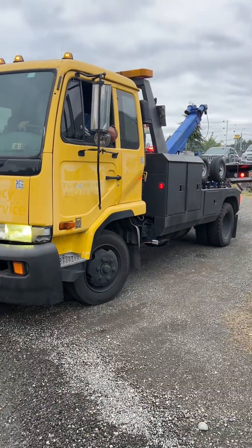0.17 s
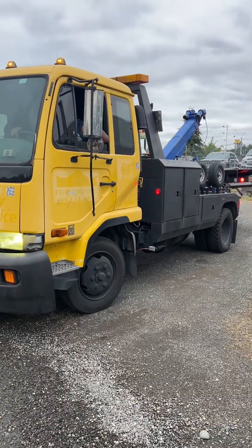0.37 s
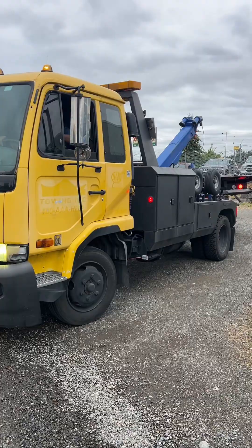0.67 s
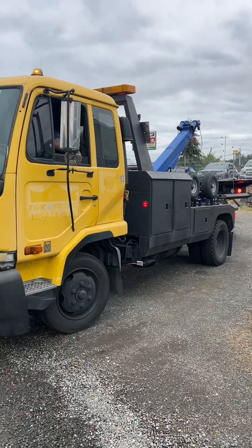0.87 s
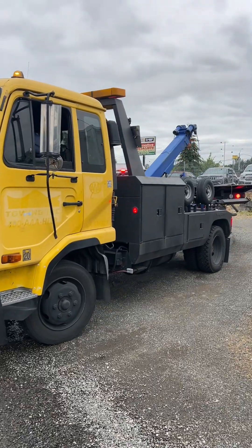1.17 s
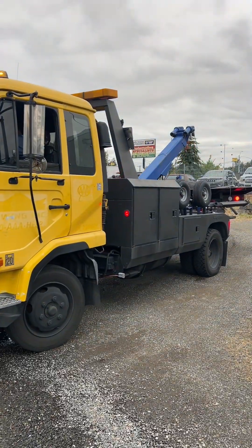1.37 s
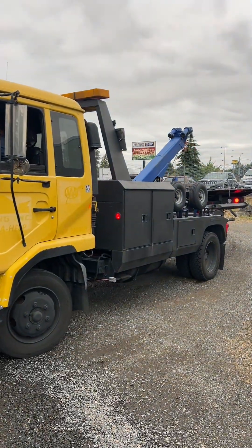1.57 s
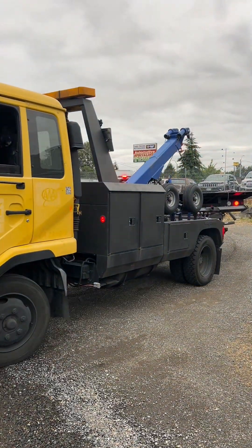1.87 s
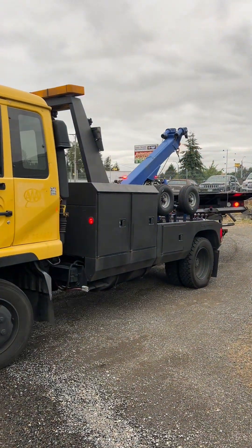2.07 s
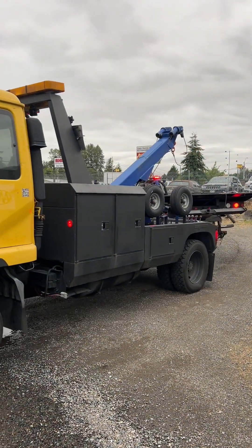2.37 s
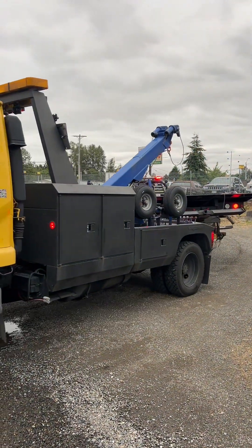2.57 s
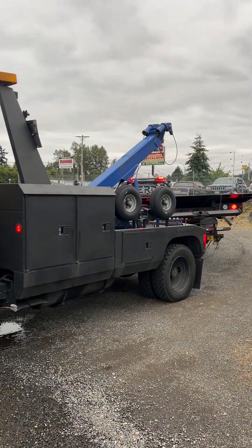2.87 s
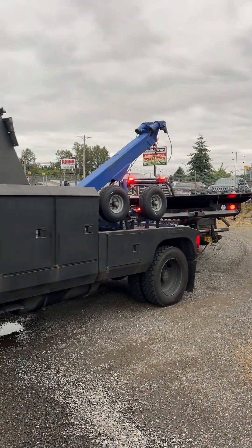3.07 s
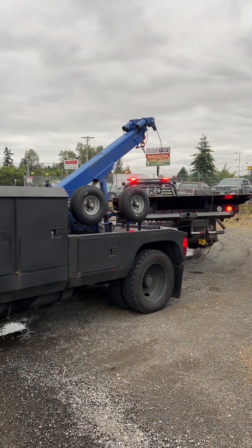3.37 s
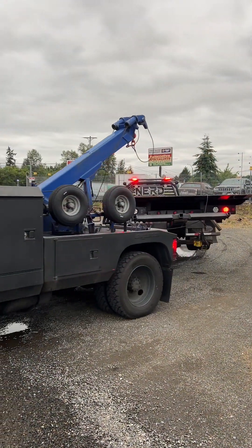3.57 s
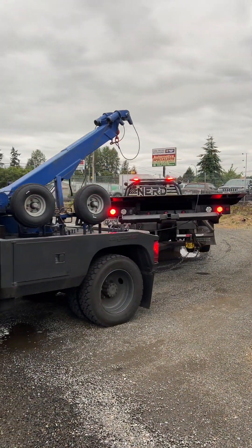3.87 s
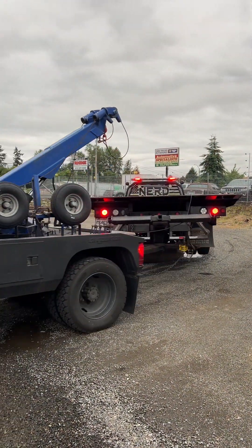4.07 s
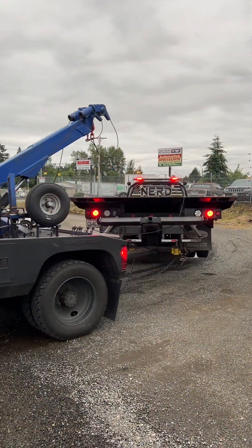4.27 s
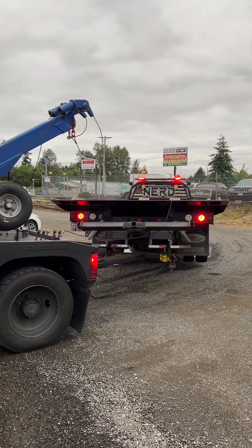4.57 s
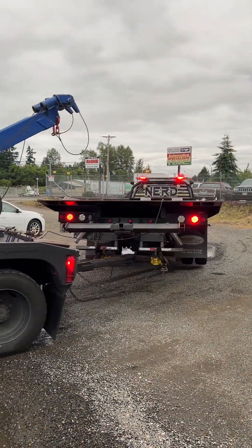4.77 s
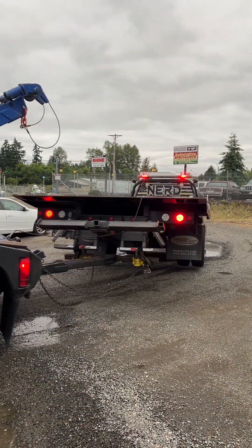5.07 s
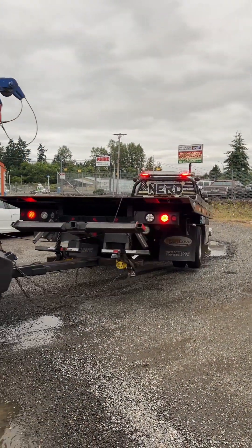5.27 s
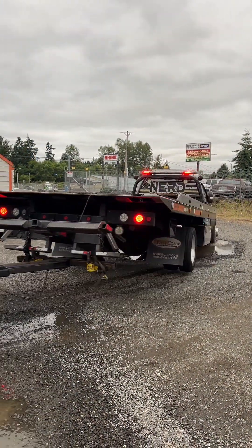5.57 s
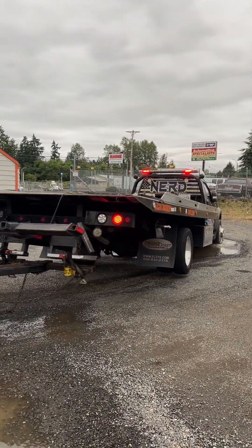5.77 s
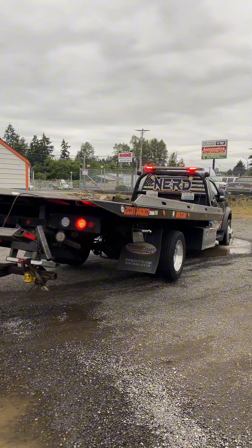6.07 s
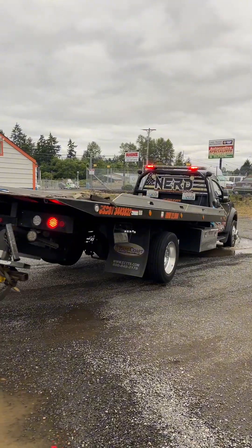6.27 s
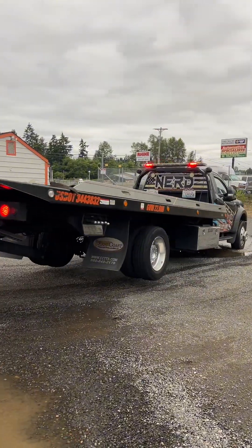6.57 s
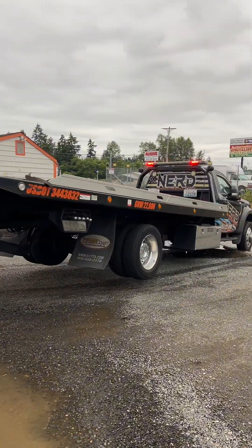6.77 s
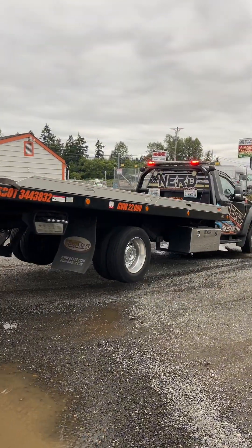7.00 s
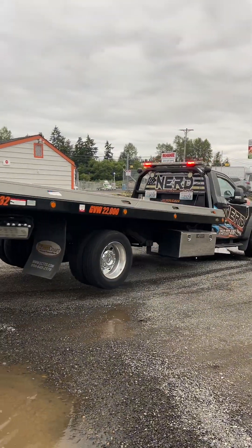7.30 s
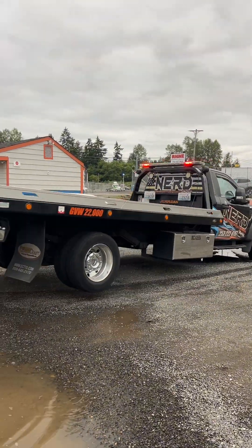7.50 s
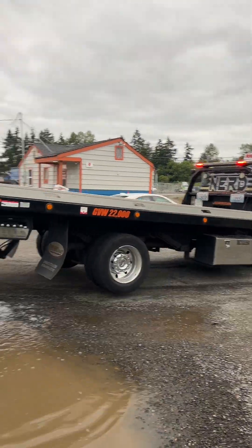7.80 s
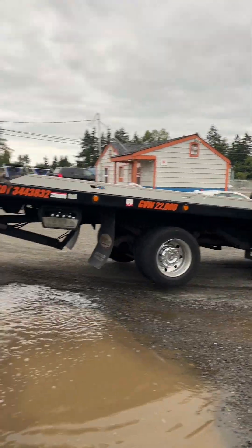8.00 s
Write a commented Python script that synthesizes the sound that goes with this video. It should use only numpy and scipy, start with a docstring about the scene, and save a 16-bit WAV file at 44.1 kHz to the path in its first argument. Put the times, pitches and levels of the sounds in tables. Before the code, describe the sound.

Close pass of a heavy diesel wrecker towing a flatbed: swelling exhaust boom, rapid knocking, crunching gravel, one thudding metal bump and hissing puddles.

```python
"""Diesel wrecker towing a flatbed

A diesel wrecker pulls away across wet gravel, close by, with a flatbed truck in tow.
Engine: tailpipe tones and puffing noise, pulsed block and casing noise, and struck crankcase modes.
One cylinder knocks hard, and rumble and clatter get louder as the engine runs faster.
Tyres: uneven filtered noise roars, decaying grains crackle, stones snap and puddles hiss as spray.
The towing gear knocks on a bump as ringing steel; gliding tones give the final drive, drones and a squeak."""
import sys
import numpy as np
from scipy import signal
from scipy.fft import rfft, irfft, next_fast_len
from scipy.io import wavfile
from scipy.ndimage import uniform_filter1d, map_coordinates

SR = 44100
rng = np.random.default_rng(int(sys.argv[2]) if len(sys.argv) > 2 else 0)


def waveform_to_disk(signal):
    """Save audio, clipped to [-1, 1], as 16-bit WAV at the path in sys.argv[1]."""
    frames = np.transpose(np.atleast_2d(signal))
    scaled = np.clip(frames, -1, 1) * 32767
    samples = np.round(scaled).astype(np.int16)
    wavfile.write(sys.argv[1], SR, samples)


N = 358974

# Engine speed: (time [s], firing rate [Hz])
FIRING_RATE = [(0.0, 33.33), (0.32, 37.07), (0.86, 43.95), (1.09, 46.77), (2.4, 48.22), (2.83, 47.46),
               (3.6, 47.56), (3.9, 46.62), (4.6, 48.58), (5.01, 46.47), (5.89, 46.8), (6.21, 43.4),
               (6.6, 46.6), (7.16, 47.4), (7.41, 47.46), (7.8, 43.62), (8.14, 45.6)]
CRUISE_HZ = 47
# Combustion strength of each cylinder, in firing order: (relative level [dB])
CYLINDER_LEVELS = [2, -.5, .8, -.8, -1.5, 0]
# Gain for each Hz of firing rate above cruising [dB per Hz]
RUMBLE_DB_PER_HZ, CLATTER_DB_PER_HZ, GRIT_DB_PER_HZ = 0.6, 0.47, 0.2
# Share of the noise power that repeats each engine cycle
BLOCK_REPEAT, RUMBLE_REPEAT = .65, .35
# Lead of the injector ticks and of the boom's peak over combustion [share of a firing period]
INJECTION_LEAD, BOOM_LEAD = .12, .24

# Single rows for parts going by: (nearest at [s], level there [dB], half length of the pass [s],
# steepness [1 = inverse distance, more when the body shadows it])
TAILPIPE_RUMBLE_PASS = (6, -27.5, .5, 0.4041)
SECOND_ORDER_PASS = (5, -25.5, 2, 1.63)
ENGINE_BAY_PASS = (3, -41, 4.5, 3)
GEARBOX_PASS = (4.5, -37.5, 0.53, 1.36)
RAP_PASS = (4.15, -33, 1.05, 1.6)  # ordinary firings rapping the crankcase
TOWED_CHASSIS_PASS = (7, -38, 0.65, 1.7)
DRIVELINE_PASS = (5.5, -32.5, 0.62, 1)  # hum of the final drive

# Tailpipe boom at the firing rate: (time [s], level [dB])
BOOM_LEVELS = [(0.0, -54), (0.02, -56), (0.41, -44), (0.75, -47), (0.91, -38.5), (2.22, -28.5),
               (4.33, -21.5), (5.92, -22.5), (6.08, -27.5), (6.51, -23), (7.48, -24), (7.62, -28),
               (8.09, -25), (8.14, -22)]
# Brief swells and dips of the second order: (centre [s], half length [s], level change [dB])
SECOND_ORDER_SWINGS = [(2, 0.13, -3), (2.642, 0.17, -9), (3.3, 0.25, 1.5), (3.94, 0.085, 3.5),
                       (4.45, 0.055, -16), (6.15, 0.066, -5), (6.348, 0.074, 3), (7.53, 0.1, -6.5),
                       (7.767, 0.14, 7.5)]
# Upper exhaust lines standing out in turn:
# (multiple of the firing rate [ratio, rounded to sixths], loudest at [s], level [dB], half length [s])
EXHAUST_LINES = [(4.67, 1.8, -36.5, 0.354), (3.5, 1.88, -41, .4), (5.67, 3.36, -45, 1.23),
                 (5, 5.3, -44, 2.4)]
# Tailpipe noise spectrum: (frequency [Hz], relative density [dB per Hz])
RUMBLE_SPECTRUM = [(20, -24), (52, -6.5), (78, 7), (150, 3.5), (200, -1), (310, -4), (420, -10),
                   (600, -16.5), (1500, -79)]

# Engine block noise spectrum: (frequency [Hz], relative density [dB per Hz])
BLOCK_SPECTRUM = [(330, -10), (470, -1.5), (550, 3), (700, 4.5), (840, -3), (1010, -1), (1400, -2.5),
                  (2000, -10), (2600, -11.5), (3000, -21), (4150, -12), (5000, -24.5), (9000, -58)]
# Gearbox casing noise spectrum: (frequency [Hz], relative density [dB per Hz])
CASING_SPECTRUM = [(600, -12), (1120, -1), (1650, -8.5), (2400, -17.5), (6000, -59)]
# Resonances of the chassis and its covers: (frequency [Hz], width [Hz], lift [dB])
PANEL_MODES = [(473, 22, 3.5), (1000, 73, 1.5), (2530, 210, 1.5)]
# The open engine bay faces the listener: (most open at [s], half length [s])
FACING_SWELL = (2.1, 2.2)

# Blows of the hard-knocking cylinder: (time [s], level [dB])
HARD_KNOCK_BLOWS = [(3.639, -22), (3.767, -26), (3.8955, -21.5), (4.024, -22), (4.1514, -22.5),
                    (4.278, -23.5), (4.4034, -23.5), (4.528, -23.5), (4.776, -26), (5.016, -26.5),
                    (5.1417, -25)]
# Crankcase modes: (frequency [Hz], relative level [dB], decay by 60 dB [s])
CRANKCASE_MODES = [(1150, -1, .034), (1340, -1.5, .024), (1640, -9, .018), (2580, -17, .024)]
RAP_SCATTER_DB = 2
# Covers kept ringing by the firings: (loudest at [s], frequency [Hz], width [Hz], level [dB], half length [s])
COVER_RINGS = [(1.798, 650.8, 21, -50, 0.56), (3.35, 1118, 14, -43.5, .5), (3.5, 2600, 57, -50.5, 0.14),
               (4.052, 1267, 54, -42.5, 0.41), (4.554, 1135, 47, -38, 0.18)]

# Towing gear contacts: (time [s], thump level [dB], clank level before CLANK_LIFT_DB [dB])
TOW_CONTACTS = [(6.411, -22, -29), (6.4205, -14, -29), (6.434, -14, -35), (6.4465, -14, -42),
                (6.4665, -19, -32), (6.568, -40, -37), (6.622, -32, -31)]
# Modes of the steel bed: (frequency [Hz], typical relative level [dB], decay by 60 dB [s])
BED_MODES = [(128, -5, 0.049), (161, -1, 0.11), (190, -3, 0.18), (248, -6, 0.052), (351, -11, 0.16),
             (654, -19.5, 0.16)]
# Loose steel noise spectrum: (frequency [Hz], relative density [dB per Hz])
CLANK_SPECTRUM = [(100, -7), (700, 4), (1200, -14), (3000, -7), (10000, -32)]
CLANK_LIFT_DB, CLANK_T60_S = 1, 0.087

# Tread roar at the front, rear and towed axle:
# (nearest at [s], level there [dB], half length [s], steepness [1 = inverse distance])
TREAD_PASSES = [(3.25, -38.5, 1.71, 1.81), (5.9, -34, 1.77, 2.35), (8.1, -36, 0.37, 1.65)]
# Tread roar spectrum: (frequency [Hz], relative density [dB per Hz])
ROAR_SPECTRUM = [(180, -4), (330, 3.5), (520, -2.5), (780, 1.5), (1000, -3), (1450, -2.5), (2000, -8.5),
                 (2600, -18), (4000, -18.5), (7000, -42.5)]
# Harder grinding on rough ground after the bump: (loudest at [s], half length [s], level [dB])
ROUGH_GROUND = (6.63, 0.32, -35)
# Towed chassis noise spectrum: (frequency [Hz], relative density [dB per Hz])
GROWL_SPECTRUM = [(200, -18), (350, 9.5), (480, -6.5), (850, -7), (1130, 1.5), (1600, -13.5), (3000, -46)]

# Grit crushed at the three axles:
# (nearest at [s], level there before GRIT_LIFT_DB [dB], half length [s], steepness [1 = inverse distance])
GRIT_PASSES = [(2.6, -49, 1.46, 2.43), (5.1, -44.5, 2.56, 2.95), (8.1, -49.5, 0.21, 3.1)]
GRIT_LIFT_DB, GRAIN_T60_S = 1.5, .014
# Gravel noise spectrum: (frequency [Hz], relative density [dB per Hz])
GRAVEL_SPECTRUM = [(1500, -2.5), (2600, -2), (4200, -3), (5100, -5.5), (5750, 2.5), (7000, -0.5),
                   (8000, 0.5), (9000, -4.5), (10000, -13.5), (11500, -36)]
# Stones snapping under the tyres: (time [s], noise level before STONE_GAIN [dB])
STONE_SNAPS = [(2.796, -43), (4.304, -38.5), (4.867, -39), (6.167, -40)]
STONE_GAIN = 1.8

# Tyres in puddles: (start [s], start to fade [s], level [dB])
PUDDLE_SPLASHES = [(5.739, 0.79, -47), (7.501, 0.33, -47.5), (7.88, 0.027, -43.5)]
SPLASH_ATTACK_S, SPLASH_T60_S = 0.031, 0.3
# Spray noise spectrum: (frequency [Hz], relative density [dB per Hz])
SPRAY_SPECTRUM = [(3000, -10.5), (5500, -6), (7000, 0.5), (8500, -0.5), (9500, -6), (11500, -23.5)]

# Driveline pitch when nearest, and its steady climb
DRIVELINE_HZ, CLIMB_HZ_PER_S = 148.3, 18
# Drones out of step with the diesel:
# (loudest at [s], pitch there [Hz], glide [Hz per s], level [dB], half length [s])
PASSING_DRONES = [(0.917, 668, -1, -44, 0.041), (1.3, 113, 30, -41.5, 0.58), (2.45, 143.2, 11, -36.5, 0.31),
                  (3.051, 76.2, -8.5, -34, 0.3), (3.618, 136.4, -89, -33.5, 0.098),
                  (4.971, 123.3, -5, -24, 0.543), (5.9, 302.4, -34.5, -39, 0.38)]
# Squeak from the towed truck: (loudest at [s], pitch there [Hz], glide [Hz per s], level [dB], half length [s])
JOINT_SQUEAKS = [(8.1, 1400, -200, -41, .04)]
SQUEAK_OCTAVE_DB = -14  # against the squeak itself

# Ground bounce thinning a band while the truck is far:
# (centre [Hz], half width at 1/e [Hz], deepest at [s], half length [s])
GROUND_DIP = (850, 100, .8, 1.6)
# The two microphone ports:
# (frequency [Hz], side against mid [dB], side phase [rad], likeness of side and mid [0-1])
PORT_SPREAD = [(110, -19, 0.91, 1), (250, -14.5, 1.85, 0.6), (443, -1, 1.27, 0.84), (845, 4, 1.03, 0.83),
               (1220, 1.5, 0.68, 0.85), (1790, -2, 1.1, 0.57), (2440, 5, 2.9, 0.07), (3540, -1.5, 4.4, 0),
               (5480, 5, 6.1, 0.16), (6200, -25.5, 1.6, 0.3)]
TOP_HZ = 11600


def count_firings(firing_hz):
    """Running firing count, aligned so the middle hard knock falls on the first cylinder."""
    firings = np.cumsum(firing_hz) / SR
    middle_s = HARD_KNOCK_BLOWS[len(HARD_KNOCK_BLOWS) // 2][0]
    at_knock = firings[round(middle_s * SR)]
    return firings + -at_knock % len(CYLINDER_LEVELS)


def exhaust(firings, first_db, second_db, rumble_db):
    """Pressure pulses from the tailpipe: two strong orders, wavering upper lines and a puffing rumble."""
    led = firings + BOOM_LEAD
    angle = 2 * np.pi * led
    first = amp(first_db + .35 * wobble(22)) * np.cos(angle)
    second = amp(second_db + .7 * wobble(16)) * np.cos(2 * angle)
    lines = np.zeros(N)
    cylinders = len(CYLINDER_LEVELS)
    for multiple, s, db, half_s in EXHAUST_LINES:
        # unequal cylinders put the upper lines on sixths of the firing rate
        order = round(multiple * cylinders) / cylinders
        level = amp(db + 1.5 * wobble(4)) * swell(s, half_s)
        lines += level * np.cos(order * angle + 0.28 * wobble(7))
    puff = throb(bursts(led, decay=.4, scatter_db=1), depth=.65)
    puffs = heard(churn(firings, RUMBLE_REPEAT) * puff, RUMBLE_SPECTRUM)
    tones = np.sqrt(2) * (first + second + lines)  # peak to rms level
    return tones + amp(rumble_db) * puffs


def tailpipe_levels(firing_hz):
    """Fundamental, second order and rumble in dB; the rumble follows distance and engine speed."""
    first_db, = curves(BOOM_LEVELS)
    swings_db = sum(db * swell(s, half_s) for s, half_s, db in SECOND_ORDER_SWINGS)
    second_db = passing(*SECOND_ORDER_PASS) + swings_db
    rumble_db = passing(*TAILPIPE_RUMBLE_PASS) + RUMBLE_DB_PER_HZ * (firing_hz - CRUISE_HZ)
    return first_db, second_db, rumble_db


def clatter(firings, facing, effort_db):
    """Combustion rattles block and gearbox casing; the beat blurs as the engine bay turns from view."""
    strokes = bursts(firings, decay=.45, scatter_db=1)
    beat = throb(strokes, depth=.25 + .7 * facing)
    block_db = passing(*ENGINE_BAY_PASS) + .7 * wobble(9)
    block = amp(block_db) * heard(panels(churn(firings, BLOCK_REPEAT) * beat), BLOCK_SPECTRUM)
    casing = amp(passing(*GEARBOX_PASS)) * heard(panels(white() * beat), CASING_SPECTRUM)
    return amp(effort_db) * (block + casing)


def panels(pair):
    """The chassis and its covers ring at a few narrow resonances."""
    def response(f):
        total = 1
        for hz, width, db in PANEL_MODES:
            damping = 1j * f * width
            total = total + (amp(db) - 1) * damping / (hz * hz - f * f + damping)
        return total
    return filtered(pair, response)


def diesel_knock(firings):
    """Firings rap the crankcase modes, one cylinder far harder."""
    def ordinary(s):
        return all(abs(s - hard_s) * CRUISE_HZ > .5 for hard_s, _ in HARD_KNOCK_BLOWS)
    raps = [(s, db) for s, db in each_firing(firings, RAP_PASS) if ordinary(s)]
    return struck(raps + HARD_KNOCK_BLOWS, CRANKCASE_MODES)


def each_firing(firings, way):
    """One (s, dB) blow per firing from a part that goes by."""
    starts = np.flatnonzero(np.diff(np.floor(firings)))
    levels_db = passing(*way)[starts] + RAP_SCATTER_DB * rng.standard_normal(len(starts))
    return list(zip(starts / SR, levels_db))


def struck(blows, modes):
    """Steel modes rung by each (s, dB), with slightly random pitch and a random second phase."""
    t = np.arange(SR // 8) / SR
    attack = 1 - np.exp(-t / .0005)
    out = np.zeros((2, N + SR))
    for hz, level, t60 in modes:
        shape = attack * amp(level - 60 * t / t60)
        for s, db in blows:
            angle = 2 * np.pi * hz * (1 + .015 * rng.standard_normal()) * t
            ring = np.sin([angle, angle + 2 * np.pi * rng.random()])
            out[:, round(s * SR):][:, :len(t)] += amp(db) * shape * ring
    return spread(*out[:, :N])


def covers(firings):
    """Firing noise drives thin steel resonators, their swing compressed by the fastenings."""
    drive = white() * bursts(firings, decay=.3, scatter_db=1)
    out = np.zeros((2, N))
    for s, hz, width, db, half_s in COVER_RINGS:
        pole = np.exp(np.pi * (2j * hz - width) / SR)
        ring = signal.lfilter([1], [1, -pole], drive)
        held_in = ring.real / np.sqrt(np.abs(ring))
        out += amp(db) * swell(s, half_s) * unit(held_in)
    return spread(*out)


def knock():
    """The towing gear drops and bounces: the bed's modes thump and loose steel clanks as noise."""
    t = np.arange(SR // 2) / SR
    attack = 1 - np.exp(-t / .0015)
    thump = np.zeros(N + SR)
    for s, db, _ in TOW_CONTACTS:
        ring = np.zeros(len(t))
        for hz, level, t60 in BED_MODES:
            decay_db = level + rng.standard_normal() - 60 * t / t60
            ring += amp(decay_db) * np.sin(2 * np.pi * hz * t)
        thump[round(s * SR):][:len(t)] += amp(db) * ring * attack
    rattle = amp(1.5 * wobble(450))
    clanks = [(s, db) for s, _, db in TOW_CONTACTS]
    cracks = amp(CLANK_LIFT_DB) * strikes(clanks, t60=CLANK_T60_S) * rattle * white()
    return thump[:N] + np.std(cracks[0]) * heard(cracks, CLANK_SPECTRUM)


def rolling(roar_db):
    """Treads grind over packed stones: a dull, uneven roar; the towed truck's chassis growls along."""
    s, half_s, rough_db = ROUGH_GROUND
    level = np.hypot(amp(roar_db), amp(rough_db) * swell(s, half_s))
    grinding = amp(1.5 * wobble(140) + 1.3 * wobble(20))
    growl = amp(passing(*TOWED_CHASSIS_PASS)) * heard(panels(white() * grinding), GROWL_SPECTRUM)
    return level * heard(panels(white() * grinding), ROAR_SPECTRUM) + growl


def tyre_levels(firing_hz):
    """Roar and grit in dB: the axles add in power, and grit gets louder with engine speed."""
    def total_db(axles):
        return 10 * np.log10(sum(amp(passing(*axle)) ** 2 for axle in axles))
    grit_db = total_db(GRIT_PASSES) + GRIT_DB_PER_HZ * (firing_hz - CRUISE_HZ)
    return total_db(TREAD_PASSES), grit_db


def gravel(firings, facing, crunch_db, grains_per_s, spread_db):
    """Wet grit crackles as random decaying grains, mixed with injector ticks and snapping stones."""
    sizes = amp(spread_db * np.minimum(rng.exponential(size=N), 2))
    cracks = (rng.random(N) < grains_per_s / SR) * sizes
    grain_decay = amp(-60 / (GRAIN_T60_S * SR))
    grit = unit(white() * signal.lfilter([1], [1, -grain_decay], cracks))
    injections = bursts(firings + INJECTION_LEAD, decay=0.43, scatter_db=2)
    ticks = white() * throb(injections, depth=.9 * facing)
    bed = amp(crunch_db + GRIT_LIFT_DB) * unit(ticks + 0.56 * grit)
    snaps = STONE_GAIN * strikes(STONE_SNAPS, t60=0.066) * white()
    mix = bed + snaps
    return np.std(mix[0]) * heard(mix, GRAVEL_SPECTRUM)


def puddles():
    """A tyre throws up a hiss of spray while it is in the water, then the hiss dies away."""
    t = np.arange(N) / SR
    spray = np.zeros(N)
    for s, hold_s, db in PUDDLE_SPLASHES:
        rise = np.clip((t - s) / SPLASH_ATTACK_S, 0, 1)
        spray += rise * amp(db - 60 * np.maximum(t - s - hold_s, 0) / SPLASH_T60_S)
    return spray * amp(2.2 * wobble(60)) * heard(white(), SPRAY_SPECTRUM)


def driveline():
    """The final drive hums at a steadily climbing pitch as it goes by."""
    tone = hum(DRIVELINE_PASS[0], DRIVELINE_HZ, CLIMB_HZ_PER_S, waver_db=1.5)
    return amp(passing(*DRIVELINE_PASS)) * tone


def drone(s, hz, glide, db, half_s):
    """A gliding tone that swells, holds and fades."""
    return amp(db) * swell(s, half_s, order=4) * hum(s, hz, glide, waver_db=1)


def squeaks():
    """A dry joint squeaks: a gliding tone with its octave."""
    out = np.zeros(N)
    for s, hz, glide, db, half_s in JOINT_SQUEAKS:
        out += drone(s, hz, glide, db, half_s)
        out += drone(s, 2 * hz, 2 * glide, db + SQUEAK_OCTAVE_DB, half_s)
    return out


def hum(s, hz, glide, waver_db):
    """A slightly unsteady machine tone that glides through hz at time s."""
    pitch = hz + glide * (np.arange(N) / SR - s)
    angle = 2 * np.pi * np.cumsum(pitch) / SR + 0.16 * wobble(11)
    return np.sqrt(2) * amp(waver_db * wobble(9.9)) * np.sin(angle)


def ground_bounce(pair):
    """The bounce off the ground hollows a band of the distant truck; it fills in as the truck nears."""
    hz, width, s, half_s = GROUND_DIP
    band = filtered(pair, lambda f: np.exp(-((f - hz) / width) ** 2))
    return pair - .7 * swell(s, half_s) * band


def passing(nearest_s, peak_db, half_s, steepness):
    """Level in dB of something that rolls by in a straight line."""
    distance = np.hypot(1, (np.arange(N) / SR - nearest_s) / half_s)
    return peak_db - steepness * 20 * np.log10(distance)


def swell(s, half_s, order=2):
    """A smooth rise and fall: 1 at s, one half at half_s either side; higher orders flatten the top."""
    away = np.abs(np.arange(N) / SR - s) / half_s
    return np.exp2(-np.minimum(away, 2 * np.pi) ** order)


def bursts(firings, decay, scatter_db):
    """An envelope of rms 1 that swells at each firing and decays over a share of the firing period."""
    index = firings.astype(int)
    scatter = scatter_db * rng.standard_normal(1024)[index]
    size_db = np.take(CYLINDER_LEVELS, index % len(CYLINDER_LEVELS)) + scatter
    pulses = amp(size_db) * np.exp(-(firings % 1) / decay)
    return unit(uniform_filter1d(pulses, size=130))  # soften the jumps over 3 ms


def throb(envelope, depth):
    """Blend a pulsing envelope with a steady one at equal power."""
    depth = np.clip(depth, 0, 1)
    return np.sqrt(1 - depth + depth * envelope ** 2)


def strikes(rows, t60):
    """An envelope that jumps at each (s, dB) and dies away."""
    t = np.arange(N) / SR
    total = np.zeros(N)
    for s, db in rows:
        sounding = (t >= s) * (t < s + 2 * t60)
        total += amp(db - 60 * np.clip(t - s, 0, 2 * t60) / t60) * sounding
    return total


def churn(firings, repeat):
    """Two noises, of which a share comes back alike in every engine cycle."""
    size = int(len(CYLINDER_LEVELS) * SR / CRUISE_HZ)
    place = firings / len(CYLINDER_LEVELS) % 1 * size
    loops = rng.standard_normal((2, size))
    cycle = np.array([map_coordinates(row, [place], mode="grid-wrap") for row in loops])
    return np.sqrt(repeat) * cycle + np.sqrt(1 - repeat) * white()


def white():
    """Two unrelated noises."""
    return rng.standard_normal((2, N))


def wobble(rate):
    """A smooth random curve, rate knots a second."""
    coarse = np.linspace(0, N, N // 32)
    knots = rng.standard_normal(int(N * rate / SR) + 4)
    return np.interp(np.arange(N), coarse, map_coordinates(knots, [coarse * rate / SR]))


def curves(rows):
    """One value per sample for each column after the time."""
    s, *cols = np.transpose(rows)
    return [np.interp(np.arange(N) / SR, s, c) for c in cols]


def along(points, hz, axis=1):
    """One column of a (Hz, ..) table on a log axis."""
    cols = np.transpose(points)
    return np.interp(np.log(hz + 1), np.log(cols[0] + 1), cols[axis])


def filtered(x, response):
    """Filter x by a response of frequency."""
    m = next_fast_len(N + SR // 4)
    return irfft(rfft(x, m) * response(np.fft.rfftfreq(m, 1 / SR)), m)[..., :N]


def heard(pair, spectrum):
    """Colour two unrelated signals and spread them over the ports; the mid has rms 1."""
    direct, diffuse = filtered(pair, lambda hz: amp(along(spectrum, hz)))
    return spread(direct, diffuse) / np.std(direct)


def spread(direct, diffuse):
    """Left and right port from a direct signal and an unrelated, scattered one."""
    def width(hz):
        return amp(along(PORT_SPREAD, hz))

    def alike(hz):
        return np.clip(along(PORT_SPREAD, hz, axis=3), 0, 1)

    def phase(hz):
        return np.exp(1j * along(PORT_SPREAD, hz, axis=2))
    side = filtered(direct, lambda hz: width(hz) * alike(hz) * phase(hz))
    side = side + filtered(diffuse, lambda hz: width(hz) * np.sqrt(1 - alike(hz) ** 2))
    return np.array([direct + side, direct - side])


def amp(db):
    """Decibels to gain."""
    return 10 ** (np.asarray(db) / 20)


def unit(x):
    """Scale to rms 1."""
    return x / np.sqrt(np.mean(x ** 2) + 1e-20)


def scene():
    """Both trucks roll past on the open lot."""
    firing_hz, = curves(FIRING_RATE)
    firings = count_firings(firing_hz)
    facing = 0.063 + 0.39 * swell(*FACING_SWELL)
    effort_db = CLATTER_DB_PER_HZ * (firing_hz - CRUISE_HZ)
    roar_db, crunch_db = tyre_levels(firing_hz)
    steel = diesel_knock(firings) + covers(firings)
    pipe = exhaust(firings, *tailpipe_levels(firing_hz))
    wrecker = pipe + clatter(firings, facing, effort_db) + steel
    grit = gravel(firings, facing, crunch_db, grains_per_s=260, spread_db=3.5)
    tyres = rolling(roar_db) + grit + puddles()
    hums = driveline() + sum(drone(*row) for row in PASSING_DRONES) + squeaks()
    return ground_bounce(wrecker + tyres) + hums + knock()


def record(dry):
    """Nothing is kept above the band limit."""
    return filtered(dry, lambda hz: hz < TOP_HZ)


dry = scene()
out = record(dry)
waveform_to_disk(out)
```